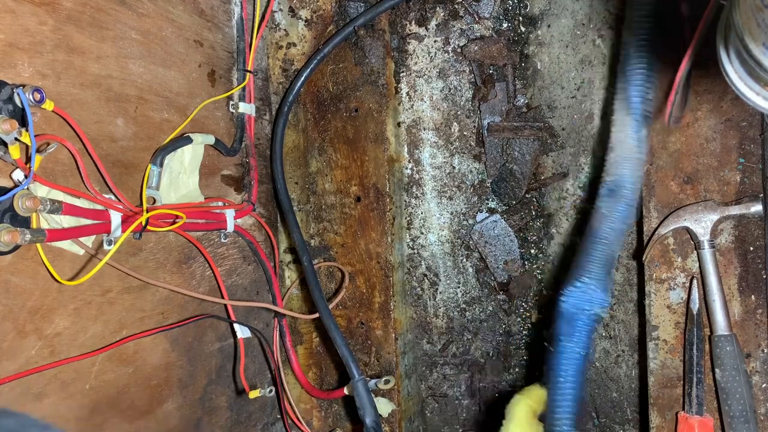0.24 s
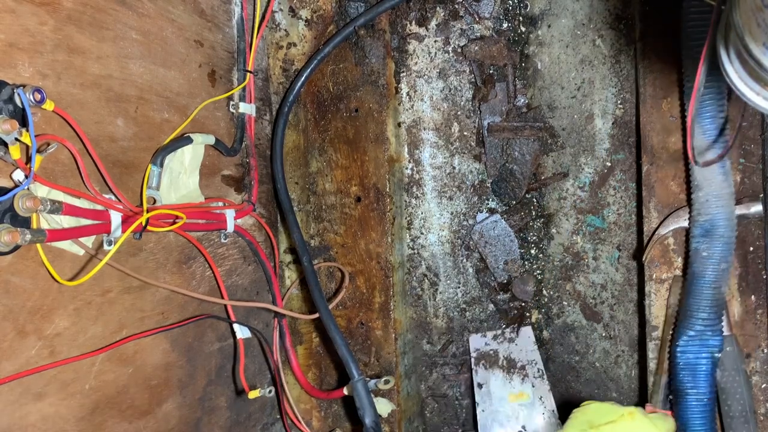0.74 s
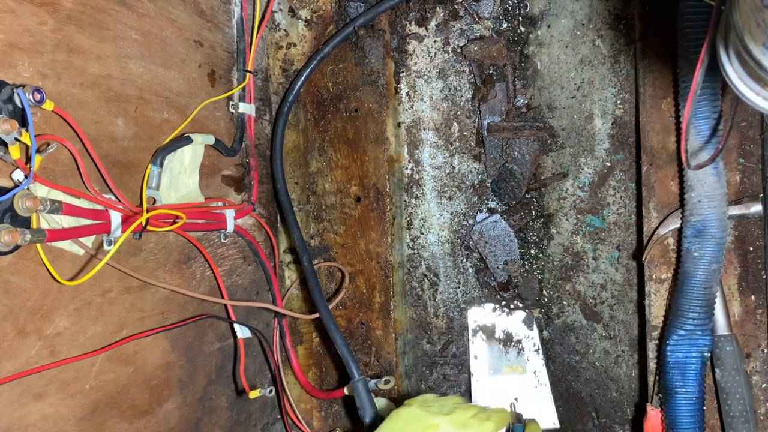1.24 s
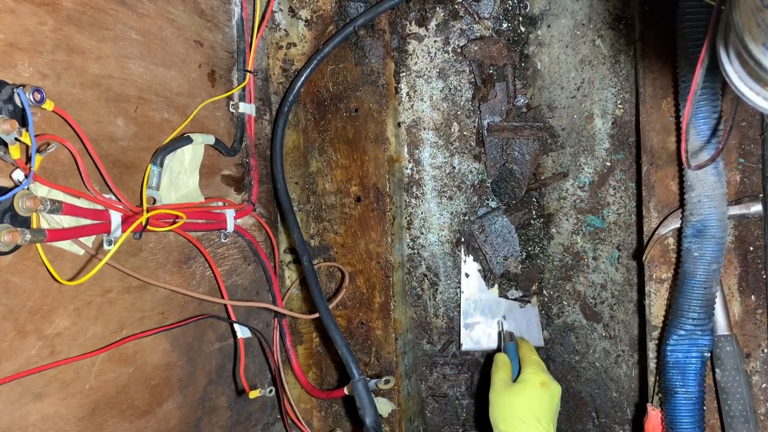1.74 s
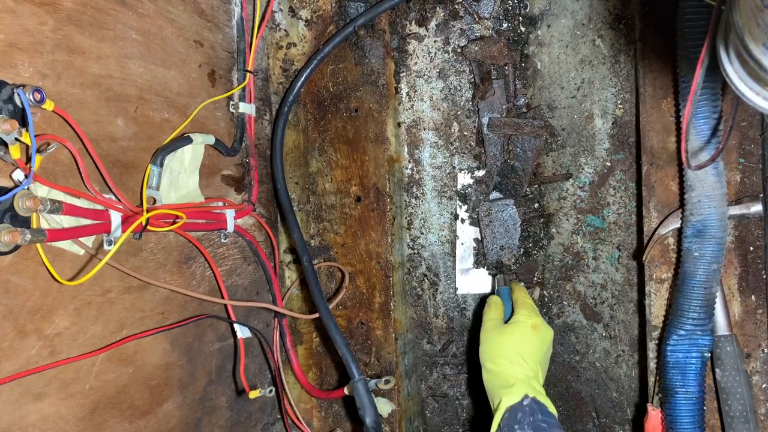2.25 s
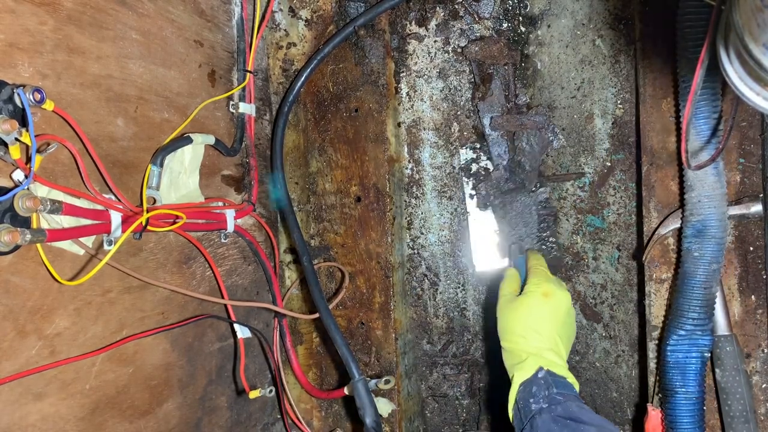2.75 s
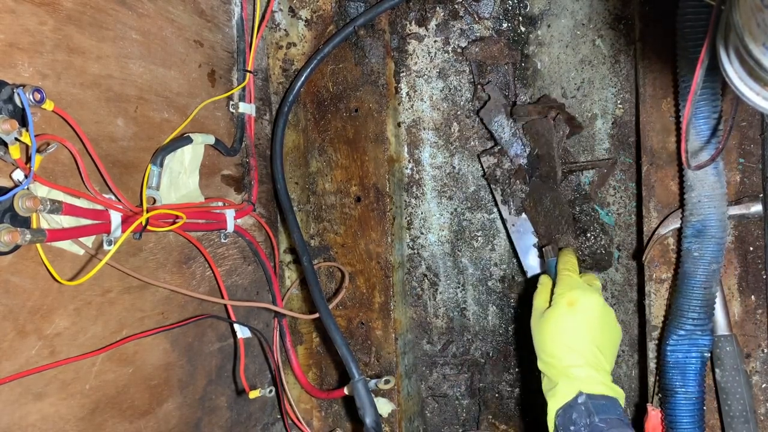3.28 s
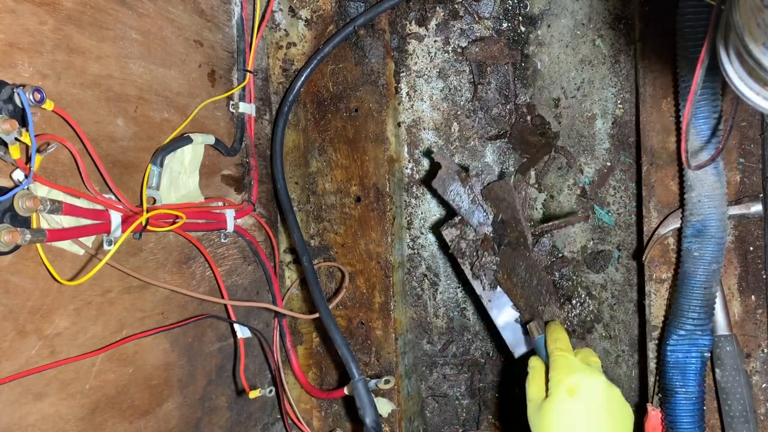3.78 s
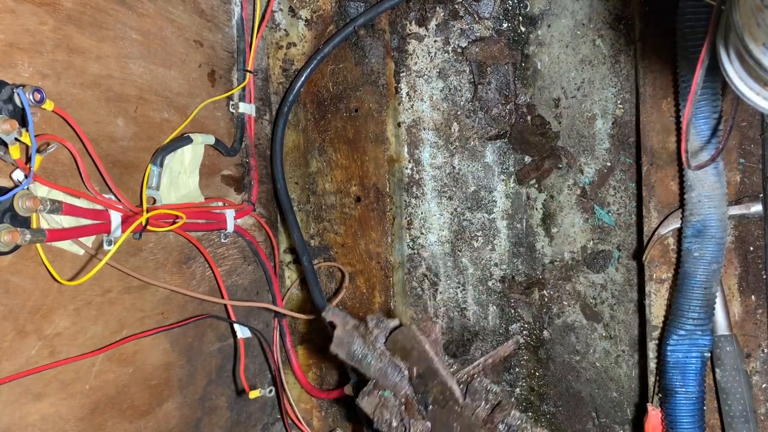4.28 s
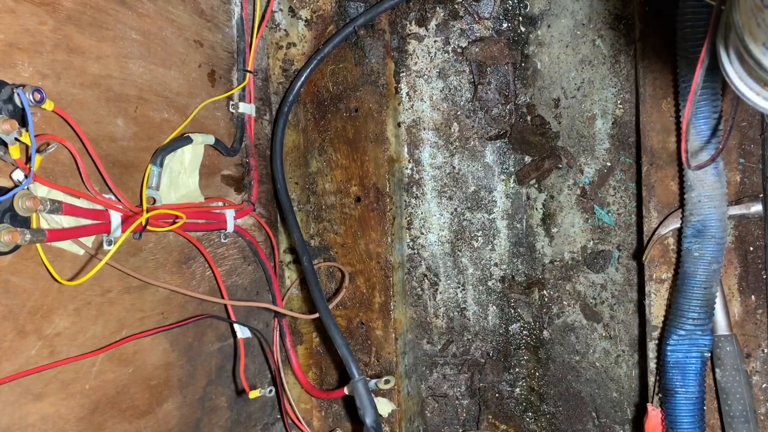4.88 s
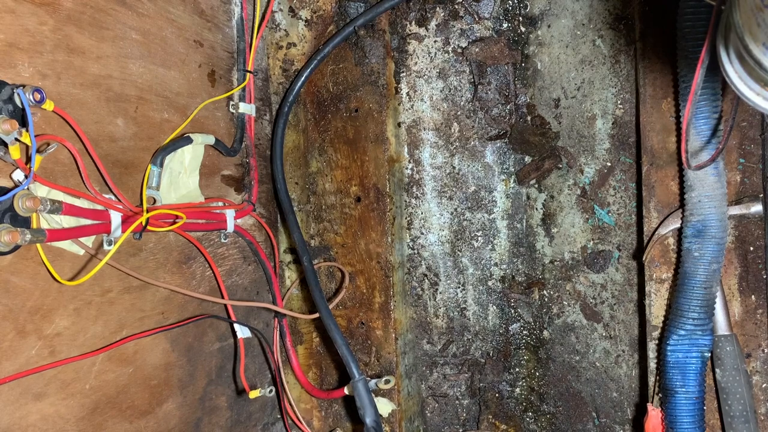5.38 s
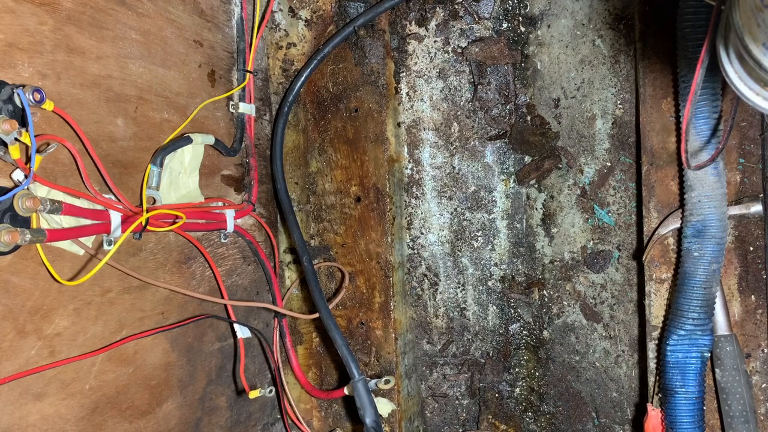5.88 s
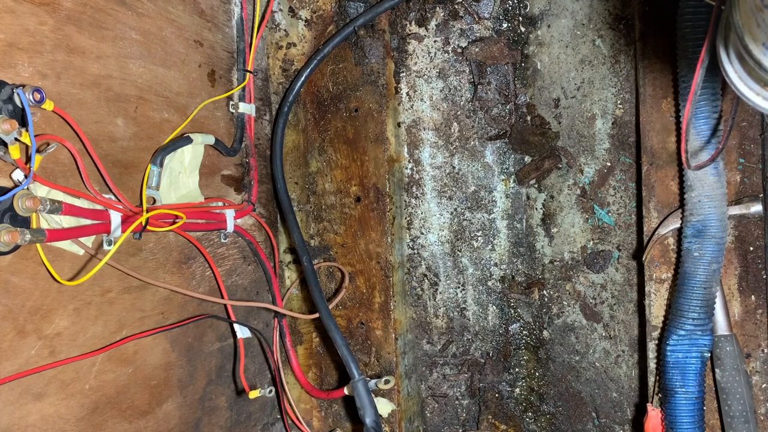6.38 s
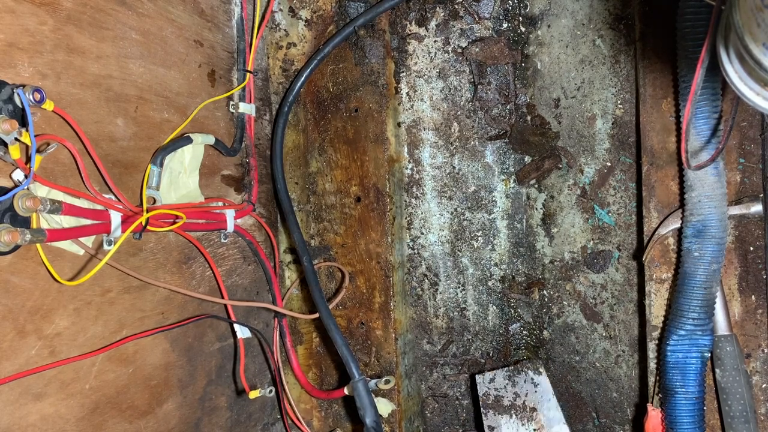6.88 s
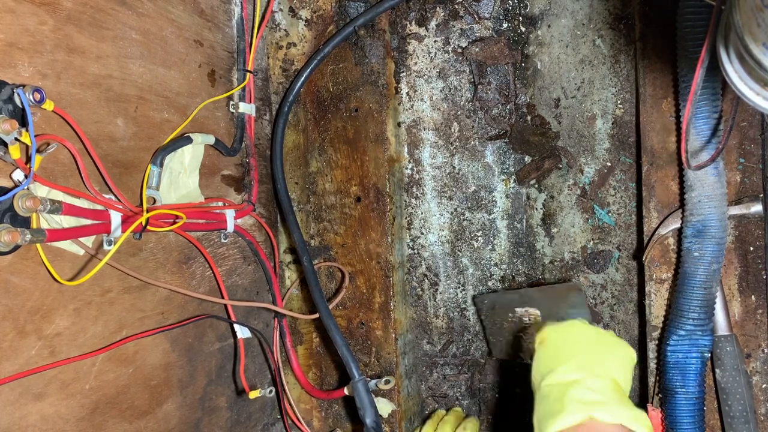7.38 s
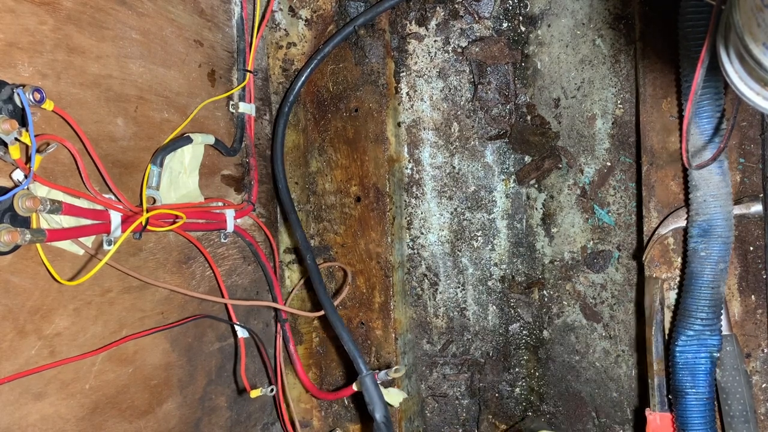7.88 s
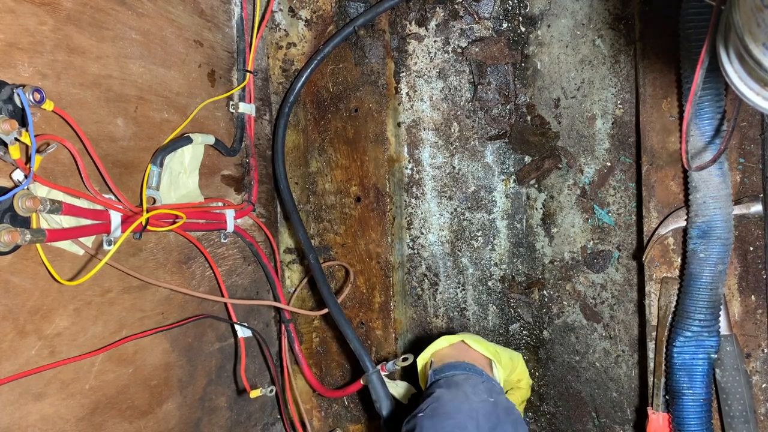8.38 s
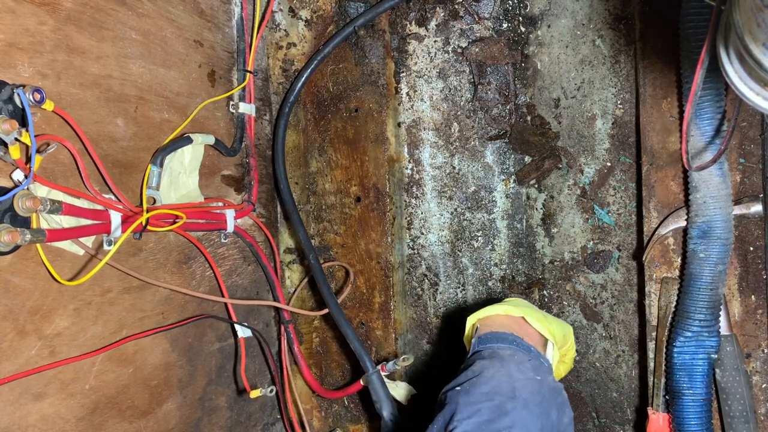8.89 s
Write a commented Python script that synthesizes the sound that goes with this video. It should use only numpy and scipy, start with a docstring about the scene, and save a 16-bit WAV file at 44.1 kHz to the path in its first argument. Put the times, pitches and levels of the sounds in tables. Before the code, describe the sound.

Close stereo sound in a cramped hull with short reverberation. Boomy handling knocks come first, then rasping, crackling shoves of a scraper against corroded iron, dotted with bright ticks and tiny squeaks. A hard hollow knock and some lighter ones follow. After a pause, the loosened plate lands with a low ringing thud and a shower of grit. Another pause, then a clink, a bump and faint gritty rubbing. A steady low hum lies under everything.

```python
"""A steel scraper is pushed under a rusty iron plate stuck to the inside of a fibreglass boat hull.
Its rasp and crackle are tiny random fractures, heard through the iron's resonances and straight through the air.
Bright ticks and knocks are short noise bursts; struck tools, hull panel and the freed plate ring as fading tones.
The plate is tipped aside with a slide of debris, and the scraper is put down with rubs and bumps of the hull.
Something, likely a motor, hums in the small cabin: a low tone with bands of noise, beside a wavering drone."""
import sys
import numpy as np
from scipy import signal
from scipy.fft import rfft, irfft, next_fast_len
from scipy.io import wavfile
from scipy.ndimage import uniform_filter1d

SR = 44100
rng = np.random.default_rng(int(sys.argv[2]) if len(sys.argv) > 2 else 0)


def to_wav(s):
    """Save 16-bit WAV."""
    ch = np.atleast_2d(s).T  # columns
    pcm = np.round(np.clip(ch, -1, 1) * 32767)  # PCM
    wavfile.write(sys.argv[1], SR, pcm.astype(np.int16))


N = 403074
TIME = np.arange(N) / SR  # seconds

# All levels in the tables are relative: later steps balance the layers.

# Noisy overtones of the hum. Each row: pitch in Hz, level in dB, width in Hz.
HUM = [(162, -48, 0.95), (239.6, -54, 9), (418.7, -44.5, 35), (518.5, -45, 53), (578, -50, 15)]
# Colour of the rush of air. Each row: frequency in Hz, level in dB.
CABIN_AIR = [(20, -15), (33, -39), (47, 0), (100, -3), (140, -5), (300, -11), (420, -10), (560, -23.5),
             (660, -13), (1000, -11.5), (1800, -17), (2700, -24), (5000, -26), (7500, -41), (16000, -44)]
# A drone that swells and fades. Each row: time in seconds, level in dB.
DRONE = [(0, -67), (1.3, -40.5), (5.7, -43), (6.7, -62)]

# How long echoes last in the cabin. Each row: frequency in Hz, time to fade by 60 dB in seconds.
CABIN = [(100, 0.24), (500, 0.26), (1200, 0.21), (3000, 0.16), (7000, 0.14), (16000, 0.16)]
# How alike the two microphones hear a sound. Each row: frequency in Hz, likeness from 0 to 1.
LIKENESS = [(95, 1), (200, 0.5), (500, 0.52), (1000, 0.035), (2000, 0.62), (4000, 1), (16000, 1)]
# How far the left microphone leads. Each row: frequency in Hz, lead in radians.
LEAD = [(0, 0), (280, 0), (600, .8), (1500, .9), (2500, 3.1), (3400, 1.3), (4600, 3.14), (15400, 18.85)]

# Bumps that shake the hull.
# Each row: start in seconds, hold in seconds, boom level in dB, panel drumming level in dB.
BUMPS = [(0.0, 0.41, -35, -41), (0.092, 0.017, -21.5, -23), (0.355, 0.06, -20.5, -37),
         (0.425, 0.032, -20.5, -25), (0.645, 0.078, -21.5, -23.5), (0.772, 0.04, -19.5, -21),
         (0.87, 0.076, -26.5, -31), (1.0, 0.38, -32.5, -46), (1.72, 0.12, -40, -54),
         (5.19, 0.099, -33.5, -23.5), (5.33, 0.029, -39, -26), (5.505, 0.019, -44, -25.5),
         (7.625, 0.022, -38, -41), (7.78, 0.1, -28, -31.5), (8.79, 0.02, -28.5, -55)]
# Colour of the shell's boom. Each row: frequency in Hz, level in dB.
BOOM = [(30, -39.5), (50, -17), (96, -11), (122, -1), (150, -13.5), (190, 0.5), (260, -33), (600, -71.5)]
# The two sides of the shell flex out of step. Each row: frequency in Hz, lead of the right in radians.
FLEX = [(82, -0.5), (100, -0.3), (150, 0.73), (200, 2), (270, 2.1), (340, 0.87), (600, -2.5)]

# Hits that make things ring: the scraper jolted, touching or laid down; the hose jostling hammer and
# chisel; blows on the hull panel and the iron on it; the freed plate landing and rocking.
# Each row: start in seconds, level in dB, frequency in Hz above which the soft contact rings little.
TAPS = [(0.096, -20, 600), (0.648, -28, 1800), (7.571, -28, 1700), (7.619, -18.5, 1490)]
CLINKS = [(0.0703, -20, 9000), (0.0762, -28, 9000), (0.4195, -36, 9000)]
CLUNKS = [(0.42, -18, 2000), (2.2015, -42, 3000), (2.806, -33, 1300), (3.3935, -17.5, 3560)]
LANDINGS = [(5.199, -16, 715), (5.2485, -14.5, 900), (5.348, -25, 2500)]
# The tones of the scraper, of hammer and chisel, of the hull panel, and of the plate as it lands.
# Each row: pitch in Hz, level in dB, time to fade by 60 dB in seconds.
SCRAPER = [(413, -11, 0.17), (548, 4, 0.15), (1240, 7.5, 0.049), (1970, 3, 0.13), (2370, 9.5, 0.06),
           (3380, -5, 0.058)]
TOOLS = [(1930, -18, 0.11), (2762, 13.5, 0.065), (2900, -2.5, 0.07), (3415, -2, 0.09), (3680, 9.5, 0.08),
         (5340, 5, 0.05)]
PANEL = [(515.6, -7.5, 0.61), (885, -5, 0.17), (1044, -1, 0.061), (1110, -8.5, 0.32), (1157, 6, 0.073),
         (1453, -2.5, 0.19), (1805, -4, 0.16), (1980, -7, 0.12), (2600, 5, 0.082)]
THUD = [(234, -3, 0.18), (332.4, 3, 0.13), (752, -8, 0.15)]

# An edge catching with a short squeak.
# Each row: time of the middle in seconds, pitch in Hz, level in dB, half length in seconds.
SQUEAKS = [(2.156, 1017, -24.5, 0.015), (2.809, 964, -18, 0.0052)]

# Hose, tools and plate striking the hull; a shorter contact is brighter.
# Each row: start in seconds, level in dB, fading time of the chatter in seconds, contact in seconds.
KNOCKS = [(0.0689, -25, 0.0033, 0.00018), (0.076, -32.5, 0.0017, 0.00025), (0.419, -25, 0.0026, 0.00014),
          (0.646, -21.5, 0.0067, 0.00066), (3.3936, -16, 0.0013, 0.00057), (3.412, -25, 0.021, 0.00066),
          (3.558, -33, 0.0013, 0.00015), (3.698, -29, 0.017, 0.0012), (5.225, -36, 0.0033, 0.00017),
          (5.51, -37.5, 0.036, 0.0001), (5.652, -37.5, 0.0014, 0.00047), (7.5705, -42.5, 0.0022, 0.00032),
          (7.617, -31, 0.0027, 0.00035), (7.7756, -28.5, 0.012, 0.00011), (8.787, -27.5, 0.0094, 0.00071)]
# Short bright ticks: rust snapping, crumbs dropping, and the sharp contact of some tool knocks.
# Each row: start in seconds, level in dB, fading time of the chatter in seconds, shaking of the plate in dB.
TICKS = [(0.4192, -28.5, 0.0015, 0), (0.645, -34, 0.032, 4.5), (0.7002, -40.5, 0.0055, -7.5),
         (0.7222, -39, 0.0058, -8), (0.861, -50.5, 0.014, -16.5), (1.238, -36.5, 0.0015, 3.5),
         (1.421, -39.5, 0.0024, -3), (1.451, -42, 0.0029, 1), (1.479, -25.5, 0.012, -2),
         (1.5567, -28, 0.024, 0), (1.576, -29.5, 0.0045, -2), (1.697, -44, 0.0054, -6),
         (1.926, -42, 0.0022, 7), (2.054, -41, 0.0039, -2), (2.086, -35.5, 0.0027, 4),
         (2.2009, -23, 0.0022, 4), (2.2454, -28.5, 0.0023, -2.5), (2.291, -34, .003, 3),
         (2.413, -34, 0.0035, -1.5), (2.802, -27, 0.012, 2), (3.539, -38, 0.0075, 0),
         (3.554, -36.5, 0.0044, -4.5), (3.696, -49, 0.003, 5), (5.138, -47, 0.006, -0.5),
         (5.183, -32.5, 0.0015, 2), (5.229, -37, 0.0014, 2.5), (5.278, -37.5, 0.0027, -3),
         (5.388, -34, 0.0047, 1), (5.687, -49, 0.02, -10.5), (5.7965, -66, 0.0022, -8),
         (7.6183, -46, 0.0026, 11), (7.7766, -32.5, 0.0013, 2), (8.8598, -46, 0.004, -9),
         (9.051, -48, 0.0019, -5.5)]
# Frequency ranges of a blow, two from the shell and then two from the contact.
# Each row: low edge in Hz, high edge in Hz, level in a knock in dB, level in a tick in dB,
# share of the plate's shaking that it follows.
BLOW_BANDS = [(375, 750, -10, -15, 0.27), (830, 3340, 0.5, -0.5, 0.84), (2950, 5240, 2.5, -3, 0.6),
              (6200, 13800, -1, 0, -1.08)]
# Resonances of plate and blade. Each row: pitch in Hz, width in Hz, level in dB.
PLATE = [(994, 60, -7), (1166, 70, -8), (1430, 100, -6), (1710, 70, -11), (2093, 73, -10.5),
         (2390, 220, -12), (4150, 560, -12.5)]

# Glove and tool shifting over the dirty hull; rust sliding off the plate; pushes of the blade, each held
# until the rust gives; the blade resting under the plate and lifting it out.
# Each row: start in seconds, length in seconds, rasp level in dB, grit level in dB.
RUBS = [(7.62, 0.2, -43.5, -66), (7.78, 0.079, -49, -48.5), (7.85, 0.039, -38.5, -46.5),
        (7.975, 0.011, -46, -49.5), (8.04, 0.56, -62, -57.5), (8.72, 0.17, -48, -61),
        (8.79, 0.15, -41, -48.5), (9.05, 0.098, -74, -54)]
SPILLS = [(5.18, 0.24, -29, -33), (5.49, 0.19, -39, -45.5)]
PUSHES = [(0.255, 0.033, -32.5, -46), (0.32, 0.16, -34.5, -51), (0.45, 0.084, -40, -47.5),
          (0.69, 0.14, -34.5, -40.5), (0.84, 0.034, -24.5, -51), (0.985, 0.025, -33.5, -34.5),
          (1.225, 0.15, -43, -39.5), (1.335, 0.34, -33.5, -33.5), (1.685, 0.046, -26.5, -26.5),
          (1.725, 0.046, -23.5, -29.5), (1.95, 0.12, -34, -35), (2.085, 0.21, -34, -30),
          (2.35, 0.12, -32, -35), (2.65, 0.029, -30.5, -44), (2.75, 0.061, -32, -37.5),
          (2.792, 0.029, -22.5, -22.5)]
DRAGS = [(-0.02, 2.59, -40, -49), (2.88, 0.072, -47.5, -52.5), (3.12, 0.68, -50.5, -52)]
# Colours of the rasp, of the grit under the blade, and of loose grit.
# Each row: frequency in Hz, level in dB.
RASP = [(100, -25), (450, 6), (750, 4.5), (1000, 1.5), (1700, -0.5), (2400, -2.5), (3500, -6.5),
        (8000, -6.5)]
BLADE_GRIT = [(300, -42.5), (1800, -74.5), (3200, 2), (5000, -1.5), (7000, 2.5), (11000, 3), (13000, -5.5),
              (16000, -13)]
LOOSE_GRIT = [(300, -76), (1800, -5), (3000, -2), (4200, 5), (7000, 1.5), (11000, -1), (13000, -3.5),
              (16000, -13)]


def amp(db):
    """Turns decibels into a factor for loudness."""
    return 10 ** (np.asarray(db) / 20)


def unit(x):
    """Scales a sound to an average (rms) level of 1."""
    return x / np.sqrt(np.mean(x ** 2) + 1e-20)


def read(points, hz):
    """Reads a table between its rows, with frequency on a logarithmic scale."""
    f, value = np.transpose(points)
    return np.interp(np.log(hz + 1), np.log(f + 1), value)


def shape(x, gain):
    """Filters a sound by a gain that depends on frequency."""
    size = next_fast_len(x.shape[-1] + 2048)
    spectrum = rfft(x, size) * gain(np.fft.rfftfreq(size, 1 / SR))
    return irfft(spectrum, size)[..., :x.shape[-1]]


def turn_phase(x, points):
    """Shifts each frequency by the angle in a table, leaving its level alone."""
    return shape(x, lambda hz: np.exp(1j * np.interp(hz, *np.transpose(points))))


def colour(x, points):
    """Filters a sound by a colour table and scales it to rms 1."""
    return unit(shape(x, lambda hz: amp(read(points, hz))))


def band(x, low_hz, high_hz):
    """Lets through only the frequencies between two edges."""
    edges = [low_hz, min(high_hz, .45 * SR)]
    return signal.sosfilt(signal.butter(3, edges, "band", fs=SR, output="sos"), x)


def pair(two):
    """Mixes two unrelated sounds until they are as alike as the two microphones hear them."""
    def same(hz):
        return np.clip(read(LIKENESS, hz), 0, 1)
    shared = shape(two[0], same)
    separate = shape(two[1], lambda hz: np.sqrt(1 - same(hz) ** 2))
    return np.array([two[0], shared + separate])


def drift(per_s):
    """A random wander of rms 1 through per_s chance points each second."""
    points = rng.standard_normal(N // 20)
    return unit(np.interp(TIME * per_s, np.arange(len(points)), points))


def gestures(rows, attack_s, release_s, slope_db):
    """One loudness curve per level column: gestures set in, change by slope_db over their length, die away."""
    start, length, *columns = np.transpose(rows)[:, :, None]
    clock = TIME[::32]  # a coarse clock is enough for slow curves
    t = clock - start
    slope = amp(slope_db * (np.clip(t / length, 0, 1) - .5))
    held = np.clip(t / attack_s, 0, 1) * slope
    envelope = held * np.exp(-np.maximum(t - length, 0) / release_s)
    # overlapping gestures add as energy
    return [np.interp(TIME, clock, np.linalg.norm(amp(db) * envelope, axis=0)) for db in columns]


def cabin(x, wet_db):
    """Mixes the direct sound with dense, short echoes from the close hull walls, fading noise in effect."""
    hz, t, z = signal.stft(rng.standard_normal((2, SR // 2)), SR, nperseg=256)
    t60 = read(CABIN, hz)[:, None]
    fading = z * amp(-60 * t / t60) / np.sqrt(t60)
    tail = pair(signal.istft(fading, SR, nperseg=256)[1])
    tail *= np.clip(np.arange(tail.shape[1]) / SR / 0.0026, 0, 1)  # echoes build up over 2.6 ms
    wet = signal.oaconvolve(x[None], tail / np.linalg.norm(tail[0]), axes=1)[:, :N]
    return (x + amp(wet_db) * wet) / np.hypot(1, amp(wet_db))


def motor(motor_hz=80.25, motor_db=-37, air_db=-39):
    """A low tone that wavers slightly, overtones made of narrow noise bands, and a soft rush of air."""
    turns = motor_hz * TIME + 0.011 * drift(per_s=8.6)
    low = amp(motor_db + 0.71 * drift(per_s=7.0)) * unit(np.sin(2 * np.pi * turns))

    def peaks(f):
        total = 0
        for hz, db, width in HUM:
            height = amp(db) * np.sqrt(SR / np.pi / width) * np.sqrt(2)
            total = total + height / (1 + (2 * (f - hz) / width) ** 2)
        return total

    overtones = shape(pair(rng.standard_normal((2, N))), peaks)
    rush = colour(pair(rng.standard_normal((2, N))), CABIN_AIR)
    air = amp(air_db + .5 * drift(per_s=13)) * rush
    return low + overtones + air


def drone(hz=199, wander_turns=0.5):
    """A tone beside the hum whose pitch and loudness waver at random."""
    s, db = np.transpose(DRONE)
    level = amp(np.interp(TIME, s, db, left=-120, right=-120))
    turns = hz * TIME + wander_turns * drift(per_s=23)
    return level * (1 + 0.38 * drift(per_s=11.0)) * np.sin(2 * np.pi * turns)


def hull():
    """Bumps make the fibreglass shell boom and its smaller panels drum; the two sides flex out of step."""
    boom, drum = gestures(BUMPS, attack_s=0.0027, release_s=0.051, slope_db=-3.5)
    shell = colour(rng.standard_normal(N), BOOM)
    panels = unit(band(rng.standard_normal(N), low_hz=225, high_hz=470))
    left, right = cabin(boom * shell + amp(-2) * drum * panels, wet_db=-6.5)
    return np.array([left, turn_phase(right, FLEX)])


def ringing(hits, modes, rise_s, rattle_db=2, rattle_bend=.025):
    """Each hit rings an object's tones; it rattles on the hull, so level (dB) and pitch (share) waver."""
    out = np.zeros(N + SR)
    t = np.arange(SR // 4) / SR
    hz, mode_db, t60 = np.transpose(modes)[:, :, None]
    for s, db, soft_hz in hits:
        rattle = unit(uniform_filter1d(rng.standard_normal((len(modes), len(t))), size=300, axis=1))
        # read backwards, the same wander serves for the pitch
        turns = np.cumsum(hz * (1 + rattle_bend * rattle[:, ::-1]), axis=1) / SR
        waves = np.sin(2 * np.pi * (turns + rng.random(hz.shape)))
        level = amp(db + mode_db - 60 * t / t60 + rattle_db * rattle)
        rings = level * waves / np.hypot(1, (hz / soft_hz) ** 2)  # a soft contact rings high tones less
        out[round(s * SR):][:len(t)] += rings.sum(0) * (1 - np.exp(-t / rise_s))
    return out[:N]


def struck():
    """Scraper, loose tools, hull panel and the dropped plate each ring with their own tones."""
    blade = ringing(TAPS, SCRAPER, rise_s=0.0011)
    tools = ringing(CLINKS, TOOLS, rise_s=0.00028)
    panel = ringing(CLUNKS, PANEL, rise_s=0.0021)
    landing = ringing(LANDINGS, THUD, rise_s=0.0013)
    return cabin(blade + tools + panel + landing, wet_db=-1.5)


def squeaks(width=0.048):
    """Blade and plate squeak where an edge catches: noise within a share of the pitch, swelling and fading."""
    out = np.zeros(N)
    t = np.arange(-SR // 8, SR // 8) / SR
    for s, hz, db, length in SQUEAKS:
        slips = unit(band(rng.standard_normal(len(t)), hz * (1 - width), hz * (1 + width)))
        out[round((s + t[0]) * SR):][:len(t)] += amp(db) * slips / np.cosh(t / length)
    return cabin(out, wet_db=-13.0)


def plate(x, ring_db, bend_share=.03, bends_per_s=9):
    """The push plus the iron's damped resonances, which wander in pitch as the point of contact moves."""
    clock = np.arange(len(x)) / SR * bends_per_s
    rings = 0
    for hz, width, db in PLATE:
        points = rng.standard_normal(int(clock[-1]) + 2)
        bend = 1 + bend_share * np.interp(clock, np.arange(len(points)), points)
        # shift the resonance down to 0 Hz, smooth there, and shift it back
        turn = np.exp(2j * np.pi * np.cumsum(hz * bend) / SR)
        r = np.exp(-np.pi * width / SR)
        smoothed = signal.lfilter([1 - r], [1, -r], x * turn.conj())
        rings = rings + amp(db) * 2 * (turn * smoothed).real
    return x + amp(ring_db) * rings


def blow(decay, ring_db, rise_s, spread_db=4):
    """A quick bite and a dying, uneven chatter of noise, rung by the plate and split into ranges."""
    t = np.arange(round(.08 * SR)) / SR
    chatter = rng.standard_normal(len(t)) * amp(spread_db * rng.standard_normal(len(t)))
    bite = chatter * np.exp(-t / decay) * (1 - np.exp(-t / rise_s))
    rung = plate(bite, ring_db)
    return np.array([unit(band(rung, low, high)) for low, high, *_ in BLOW_BANDS])


def knocks():
    """Things strike the hull; treble above 1 / contact time is weakened."""
    out = np.zeros((len(BLOW_BANDS), N + SR))
    knock_db = np.transpose(BLOW_BANDS)[2][:, None]
    for s, db, decay, contact in KNOCKS:
        softened = signal.butter(3, min(1 / contact, .45 * SR), fs=SR)
        burst = amp(db + knock_db) * blow(decay, ring_db=-8.5, rise_s=0.00043)
        out[:, round(s * SR):][:, :burst.shape[1]] += signal.lfilter(*softened, burst)
    return out[:, :N]


def ticks():
    """Snapping rust, dropping crumbs and sharp tool contacts keep their treble; the plate's shaking varies."""
    out = np.zeros((len(BLOW_BANDS), N + SR))
    tick_db, shaken = np.transpose(BLOW_BANDS)[3:, :, None]
    for s, db, decay, shake_db in TICKS:
        burst = amp(db + tick_db + shaken * shake_db) * blow(decay, ring_db=14.0, rise_s=0.00062)
        out[:, round(s * SR):][:, :burst.shape[1]] += burst
    return out[:, :N]


def blows():
    """The whole hull radiates the low ranges with more echo; the treble comes from the contact."""
    ranges = knocks() + ticks()
    return cabin(ranges[:2].sum(0), wet_db=1.0) + cabin(ranges[2:].sum(0), wet_db=-3)


def uneven_colour(x, patch_db=4):
    """Random patches of louder and softer level across time and frequency make the grit's colour uneven."""
    z = signal.stft(x, nperseg=512, noverlap=384)[2]
    patches = uniform_filter1d(rng.standard_normal(z.T.shape), size=10, axis=0)  # smooth in time
    patches = unit(uniform_filter1d(patches, size=5, axis=1))  # and in frequency
    return signal.istft(z * amp(patch_db * patches.T), nperseg=512, noverlap=384)[1][:N]


def grains(per_s, spread_db, coarse_per_s, coarse_db, clump_db):
    """Tiny uneven fractures and crunching coarse flakes, bunched as the contact sticks and slips."""
    sizes = amp(spread_db * np.minimum(rng.exponential(1, N), 4))
    fine = sizes * (rng.random(N) < per_s / SR)
    breaks = amp(coarse_db) * (rng.random(N) < coarse_per_s / SR)
    coarse = signal.lfilter([1], [1, -np.exp(-1 / (.0016 * SR))], breaks)  # crumbles for about 1.6 ms
    bunching = amp(clump_db * np.tanh(drift(per_s=290)))
    return uneven_colour((fine + coarse) * rng.choice([-1, 1], N) * bunching)


def friction(force, grit_colour, clicks, ring_db, rasp_db, grit_db):
    """The same fractures rasp through the iron and crackle directly into the air."""
    rasp, grit = force
    through_iron = amp(rasp_db) * rasp * colour(plate(clicks, ring_db), RASP)
    through_air = amp(grit_db) * grit * colour(clicks, grit_colour)
    return cabin(through_iron + through_air, wet_db=-2.5)


def glove():
    """Glove and tool rub loose grit over the dirty hull, as trains of small fractures."""
    rubbing = gestures(RUBS, attack_s=0.0065, release_s=0.034, slope_db=-3.0)
    clicks = grains(per_s=5400, spread_db=2.4, coarse_per_s=40, coarse_db=-2, clump_db=-4.5)
    return friction(rubbing, LOOSE_GRIT, clicks, ring_db=23, rasp_db=5.0, grit_db=7.0)


def spill():
    """Rust slides off the tipped plate, a dense shower of grains that fades as it thins out."""
    spilling = gestures(SPILLS, attack_s=0.0009, release_s=0.068, slope_db=-6.0)
    clicks = grains(per_s=7000, spread_db=2.2, coarse_per_s=130, coarse_db=3, clump_db=-1.5)
    return friction(spilling, LOOSE_GRIT, clicks, ring_db=-28, rasp_db=0.0, grit_db=3.0)


def scraper():
    """The pushed or dragged blade breaks rust grain by grain and sets the iron plate rasping."""
    pushes = gestures(PUSHES, attack_s=.018, release_s=0.029, slope_db=-0.5)
    drags = gestures(DRAGS, attack_s=0.026, release_s=0.13, slope_db=6.5)
    clicks = grains(per_s=5000, spread_db=2.6, coarse_per_s=70, coarse_db=3.5, clump_db=2.0)
    force = np.hypot(pushes, drags)
    return friction(force, BLADE_GRIT, clicks, ring_db=17.0, rasp_db=1.0, grit_db=-1.0)


def scene():
    """Scraping, blows, spilling and handling over the hum."""
    background = motor() + drone()
    handling = hull() + struck() + squeaks() + blows() + glove()
    return background + handling + spill() + scraper()


def record(dry):
    """The right microphone lags the left by an angle set for each frequency; then the top treble is cut."""
    right = turn_phase(dry[1], [(hz, -lead) for hz, lead in LEAD])
    ports = amp(-3.5) * np.array([dry[0], right])
    treble_cut = signal.firwin(511, 15900, window=("kaiser", 9), fs=SR)  # edge in Hz
    return signal.oaconvolve(ports, treble_cut[None], "same")


dry = scene()
out = record(dry)
to_wav(out)
```